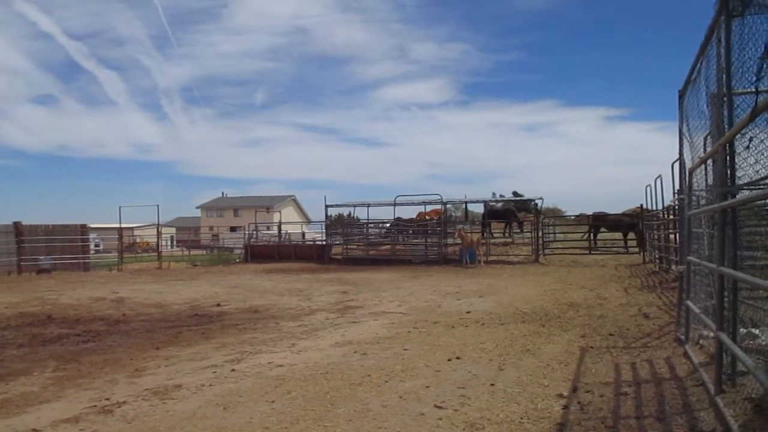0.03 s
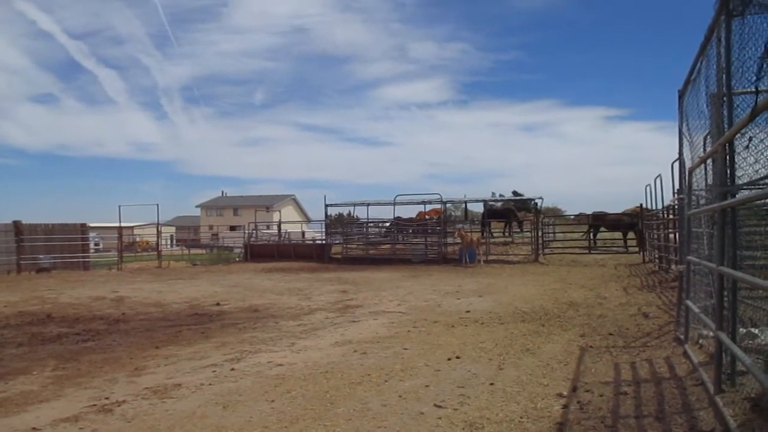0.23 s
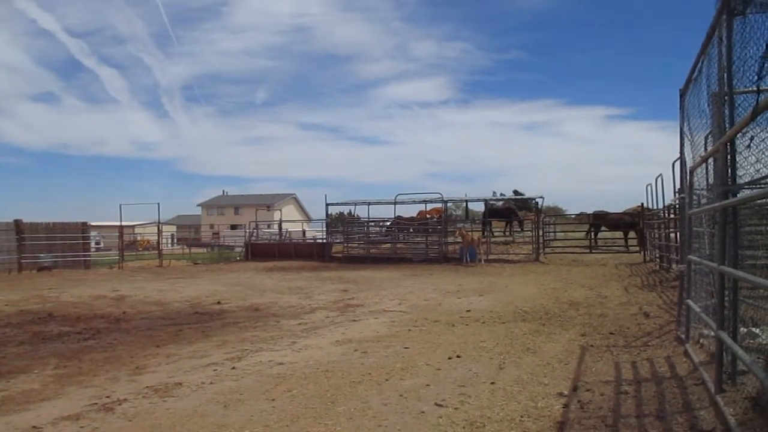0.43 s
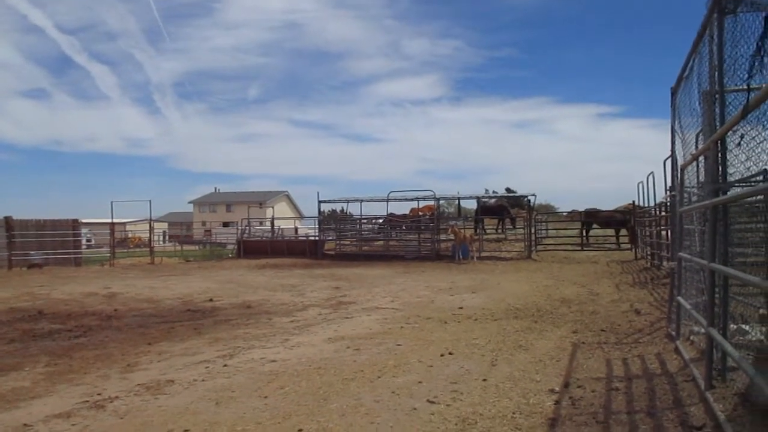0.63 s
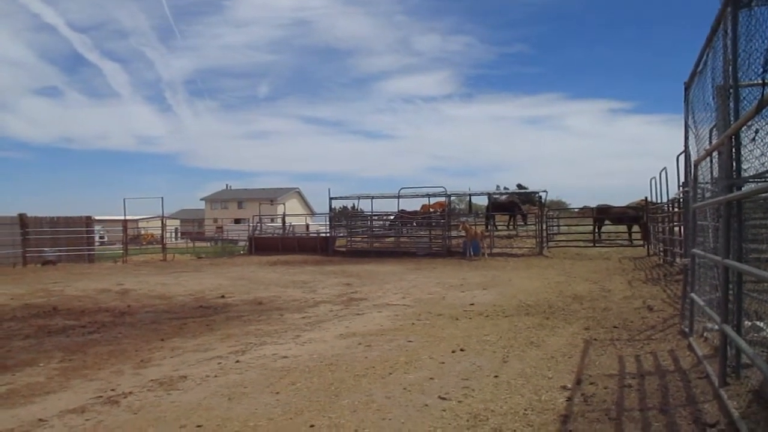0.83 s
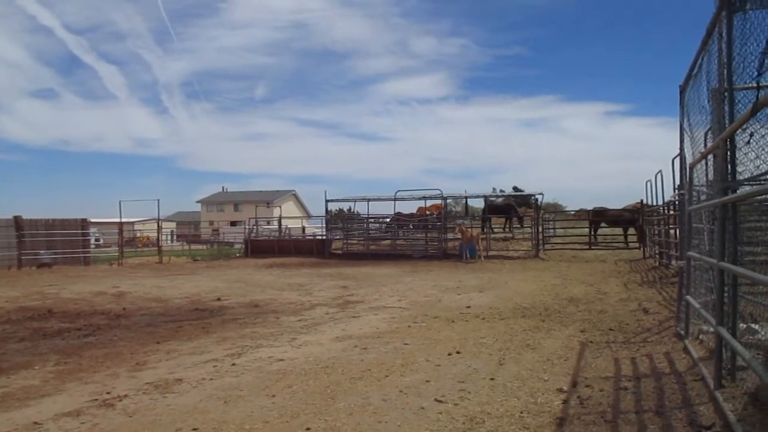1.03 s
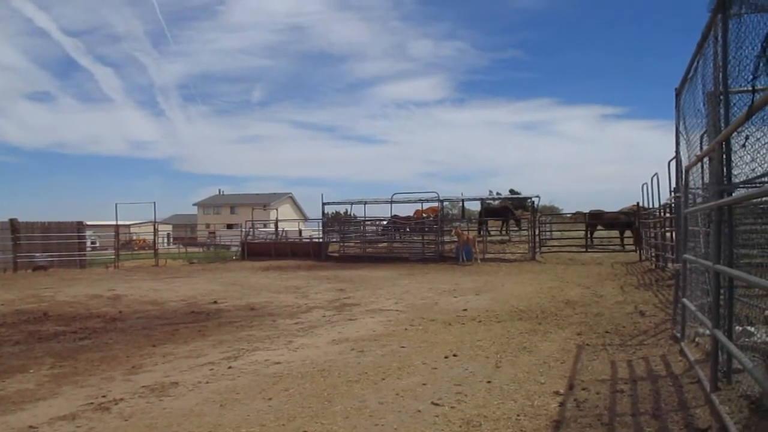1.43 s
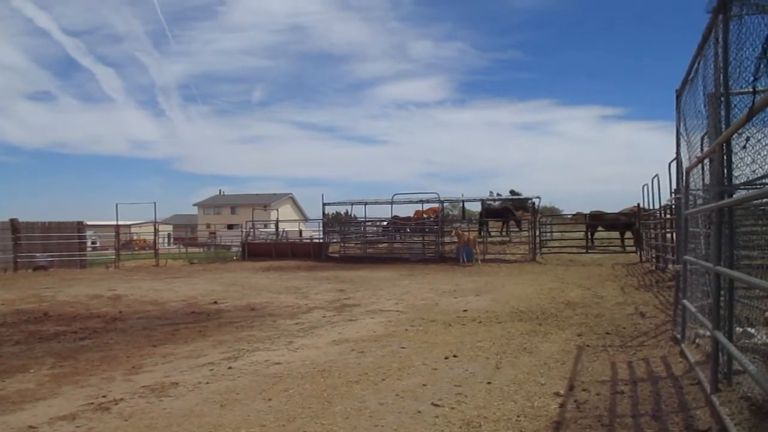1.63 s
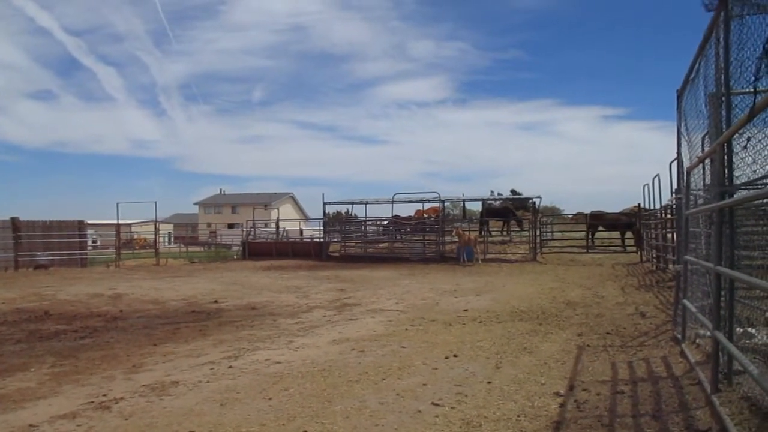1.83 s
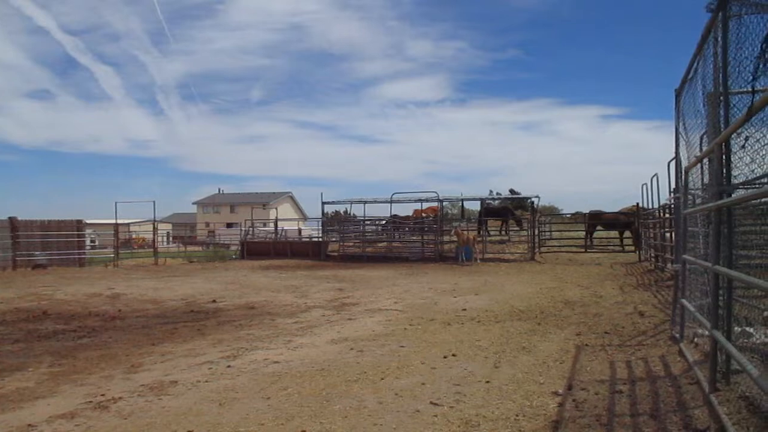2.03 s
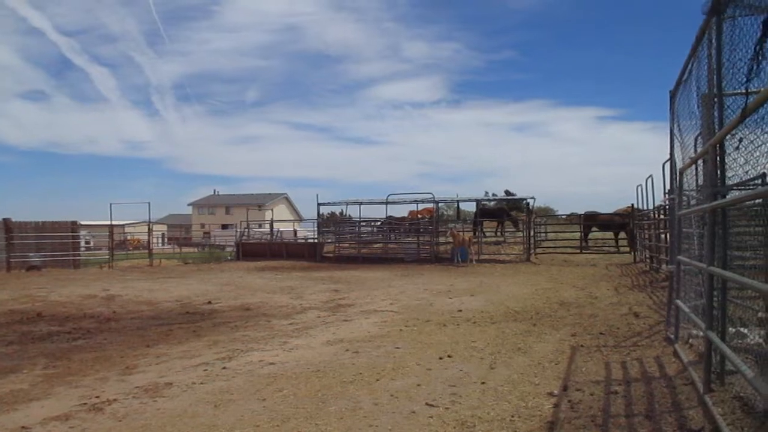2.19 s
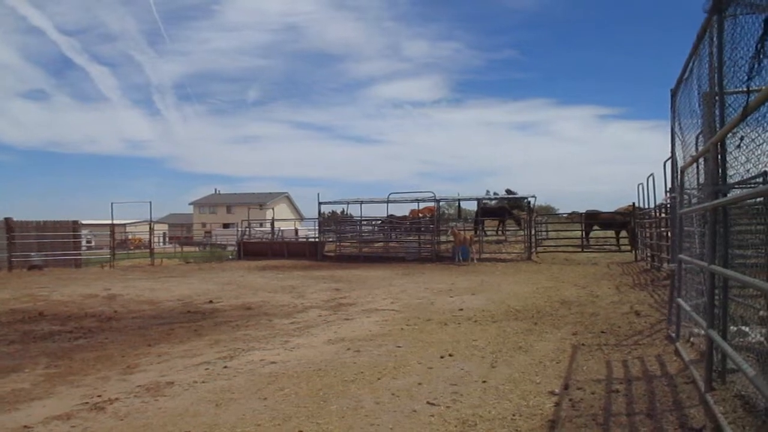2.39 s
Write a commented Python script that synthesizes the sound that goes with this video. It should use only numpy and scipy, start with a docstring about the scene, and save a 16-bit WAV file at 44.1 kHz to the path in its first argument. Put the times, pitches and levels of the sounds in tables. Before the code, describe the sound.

A horse whinnies once, high and quavering, sinking into a fluttering nicker over light wind.

```python
"""Whinny across a paddock

A horse's low grunt jumps into a high, quavering squeal. In the dips a second, lower voice breaks in
and shakes it, roughest past the middle of the call. Both ring through the throat's resonances, then
the call sinks into a fluttering nicker that slows to single flaps of air.
Light wind rumbles over the open dirt; the pens answer faintly."""
import sys
import numpy as np
from scipy import signal
from scipy.fft import rfft, irfft, next_fast_len
from scipy.io import wavfile
from scipy.ndimage import map_coordinates

SR = 44100
rng = np.random.default_rng(int(sys.argv[2]) if len(sys.argv) > 2 else 0)


def dump(signal):
    """Clip the signal to [-1, 1] and save it as 16-bit WAV at the path in sys.argv[1]."""
    limited = np.clip(np.atleast_2d(signal).T, -1, 1)
    pcm = np.round(limited * 32767).astype(np.int16)
    wavfile.write(sys.argv[1], SR, pcm)


N = 112454

# the squeal's rise and end, ahead of the throat (time [s], pitch [Hz], level [dB])
SQUEAL_ENDS = [(.24, 1000, -58.5), (.28, 1243, -12.5), (.308, 1274, -16), (1.82, 1300, -38)]
# its quavers: a crest, then a dip, each (time [s], pitch [Hz], level [dB])
QUAVERS = [(.362, 1781, -17.5, .392, 1602, -13), (.437, 1884, -19, .478, 1598, -10.5),
           (.525, 1766, -12.5, 0.55, 1530, -11), (.618, 1851, -11.5, .66, 1600, -11.5),
           (.718, 1941, -11, .768, 1631, -15), (.818, 1926, -11, .868, 1591, -13.5),
           (.922, 1893, -12.5, 1, 1566, -17), (1.025, 1867, -10, 1.072, 1557, -14),
           (1.13, 1869, -11, 1.16, 1558, -16.5), (1.235, 1866, -12.5, 1.31, 1549, -16.5),
           (1.343, 1846, -11.5, 1.39, 1442, -15), (1.448, 1776, -12.5, 1.52, 1400, -18.5),
           (1.555, 1726, -12, 1.603, 1335, -21), (1.658, 1604, -12.5, 1.73, 1253, -30),
           (1.755, 1404, -16.5, 1.785, 1345, -17.5)]
# its overtones, ahead of tilt and resonances (multiple of the pitch, level [dB])
OVERTONES = [(2, -24.5), (3, -30.5), (4, -40.5), (5, -47.5), (6, -41.5), (7, -45)]
# their tilt, round to shrill (time [s], tilt [dB per overtone])
OVERTONE_TILT = [(.31, 2), (.36, -16), (.41, -12), (.46, -3), (.6, 0), (.75, -1), (1.3, -0.5), (1.6, 0)]
# low voice (time [s], length [s], pitch [Hz], tone [dB], rasp [dB], hiss [dB], roughness [0-1])
BURSTS = [(.482, 0.055, 420, -55, -27, -44, 0.6), (0.571, 0.058, 431.4, -26, -19.5, -39, 0),
          (.664, 0.05, 427.9, -27.5, -18, -34.5, 0.08), (0.767, 0.069, 385.2, -26.5, -16.5, -39, 0.62),
          (0.871, 0.083, 345, -24.5, -18.5, -35.5, 0.69), (.972, 0.083, 349.9, -21.5, -19, -35.5, 0.62),
          (1.073, 0.094, 335, -24, -18.5, -34.5, 0.79), (1.177, .1, 340.5, -25.5, -17, -34, 0.87),
          (1.283, 0.095, 333.9, -24, -17.5, -36.5, 0.86), (1.387, 0.094, 355.1, -21.5, -17.5, -47.5, .7),
          (1.496, 0.1, 364.6, -21, -19, -46.5, .7), (1.603, .1, 354.9, -19, -20, -41.5, 0.62),
          (1.694, 0.088, 335, -16.5, -19.5, -39.5, 0.26), (1.772, 0.068, 338.9, -16, -17, -37, 0.32)]
# envelope of a burst (time from its middle [lengths], tone [dB], rasp [dB], hiss [dB])
BURST_ENVELOPE = [(-0.88, -33, -38, -33), (-.4, -17.5, -5.5, -6.5), (-0.24, -3.5, 1.5, -1),
                  (-0.032, 1.5, -9.5, -6.5), (0.2, -3, -3.5, -3), (0.29, -21, -11, -7.5),
                  (0.66, -54, -24.5, -24)]
# opening grunt (time [s], pitch [Hz], tone [dB], rasp [dB])
GRUNT = [(.06, 104.8, -51, -57), (.13, 125, -46, -70), (.17, 161.4, -33, -43), (.236, 187.5, -31, -32.5),
         (.25, 285.7, -20.5, -23.5), (.28, 337, -21, -28.5), (.318, 361.2, -18, -25.5),
         (.335, 350, -40.5, -34), (.368, 352, -31, -51), (.39, 352, -55, -74)]
# the nicker's fade (time [s], chest [dB], rasp [dB])
NICKER_LEVELS = [(1.8, -17, -31), (1.814, -23.5, -29.5), (1.894, -20, -23.5), (1.938, -25.5, -29),
                 (1.978, -20.5, -19.5), (2.054, -21, -30), (2.092, -22.5, -22.5), (2.15, -31.5, -37.5),
                 (2.194, -25.5, -29), (2.28, -33.5, -41), (2.3, -28, -31.5), (2.346, -39.5, -40),
                 (2.476, -31.5, -36), (2.482, -24.5, -44), (2.516, -42, -31), (2.55, -28, -42)]
# its sinking and slowing (time [s], pitch [Hz], flutter [Hz])
NICKER_RATES = [(1.8, 325.8, 81), (1.95, 294.2, 78.5), (2.08, 256.3, 67.6), (2.2, 234.8, 54),
                (2.5, 213.7, 36)]
# strongest flaps (time [s], level [dB])
FLAPS = [(1.712, -28), (2.025, -22), (2.064, -22), (2.088, -19.5), (2.159, -28), (2.177, -25.5),
         (2.299, -26), (2.367, -32.5), (2.416, -28), (2.448, -29.5), (2.469, -29.5), (2.521, -27.5)]
# squeaks of air (time [s], length [s], start pitch [Hz], end pitch [Hz], level [dB])
SQUEAKS = [(0.213, 0.037, 4500, 3910, -46), (2.001, 0.051, 4530, 4160, -48),
           (2.243, 0.065, 6300, 4900, -61)]
# wind buffets (time [s], level [dB])
GUSTS = [(0.0, -46), (0.04, -34.5), (0.15, -40.5), (1.36, -51), (1.41, -43.5), (1.55, -49), (1.84, -36),
         (1.89, -38), (1.95, -29.5), (1.99, -58), (2.04, -25), (2.09, -29), (2.52, -35), (2.55, -41)]
# throat and upper resonances (centre [Hz], width [Hz], level [dB])
THROAT_RESONANCES = [(1017, 116, -2), (1361, 115, -6), (1693.8, 70, 2), (1970, 128, 2), (2248, 31, -0.5),
                     (2354, 79, 2), (2980, 88, -14.5), (3560, 57, -7), (5330, 170, -15)]
UPPER_RESONANCES = [(3064, 144, -2.5), (3223, 120, -1.5), (3510, 215, -3), (4134, 240, 2), (4800, 260, 0),
                    (5380, 150, 1), (6890, 440, -1), (7270, 200, -9), (8120, 500, -3), (8940, 450, -8.5),
                    (10960, 1100, -16)]
# tone colour of each layer (frequency [Hz], level [dB])
RASP_EQ = [(300, -12), (600, 3), (800, -5.5), (940, 3), (1070, -1.5), (1160, -4), (1330, 0.5), (2280, 2),
           (2400, -10.5), (2650, -9.5), (4000, -7), (6000, -12), (15000, -25)]
HISS_EQ = [(2000, -35), (3200, 5), (6000, -3.5), (9000, -0.5), (10500, -6), (15500, -11)]
GROWL_EQ = [(90, -40), (190, -15), (270, 1.5), (400, 1), (500, -7), (600, -9), (800, -31), (4000, -110)]  # the low voice's rough edge
THROATY_EQ = [(400, -31), (620, -9), (880, 2), (1100, 5.5), (1330, 8), (1650, -19), (3000, -72)]  # its chesty harmonics
NICKER_RASP_EQ = [(300, -2), (580, 6.5), (780, -7), (1000, 6.5), (1170, 4), (1400, 3), (2280, -3.5),
                  (2400, -17.5), (2700, -7.5), (3800, -9.5), (5500, -37), (15000, -29)]
NICKER_HISS_EQ = [(3000, -1), (6000, -10.5), (6700, -5.5), (7500, -9.5), (9100, -2), (10000, -17),
                  (11200, -8.5), (12200, -15), (15500, -29.5)]
CHEST_EQ = [(30, -17), (70, -26.5), (150, 1), (195, -8.5), (250, 4), (370, -4.5), (480, -19.5), (800, -28),
            (4000, -110)]
WIND_EQ = [(15, -23), (40, -9.5), (75, -1.5), (130, -7.5), (250, -20), (800, -39), (4000, -110)]
AIR_EQ = [(30, -16), (90, -9.5), (350, -2.5), (480, -10), (1000, -15.5), (2100, -23), (2300, -14),
          (2480, -28), (5000, -35), (10000, -41), (15500, -43.5)]


def squeal(jitter=0.0392, sidebands=0.61, full_shake_db=-20.5):
    """Two voices at once: the high one swings through the resonances while the low one shakes it."""
    hz, level_db = quavers()
    low, low_phase, rasp_gain, rough = low_voice(hz)
    shake = np.clip(rasp_gain / amp(full_shake_db), 0, 1)
    phase = phase_of(hz * (1 + 0.0038 * wobble(250) + jitter * shake * rough * wobble(700)))
    tremolo = 1 + sidebands * shake * np.cos(low_phase)
    swell = np.sqrt(2) * amp(level_db) * tremolo * between(0.27, 1.82, .01)
    return filtered(swell * np.sin(phase), throat) + filtered(swell * overtones(phase), upper) + low


def quavers(fall_skew=0.96, rise_skew=.88):
    """Pitch and level glide from crest to dip and back; a skew under 1 moves early in the swing."""
    crests, dips = [q[:3] for q in QUAVERS], [q[3:] for q in QUAVERS]
    times, hz, db = np.transpose(sorted(crests + dips + SQUEAL_ENDS))
    turns = np.arange(len(times))
    step = np.interp(clock(), times, turns)
    falling = np.append(np.diff(hz) < 0, False)[step.astype(int)]
    skew = np.where(falling, fall_skew, rise_skew)
    eased = np.floor(step) + np.sin(np.pi / 2 * (step % 1) ** skew) ** 2
    return np.interp(eased, turns, hz), np.interp(eased, turns, db)


def overtones(phase, flicker_db=4.0, fray_per_s=0.16):
    """The squeal's overtones strengthen as it turns shrill and fray as the horse tires."""
    tilt_db, = curves(OVERTONE_TILT)
    frayed = phase + fray_per_s * clock() * wobble(650)
    return sum(amp(db + tilt_db * (k - 2) + flicker_db * wobble(90)) * np.sin(k * frayed)
               for k, db in OVERTONES)


def low_voice(high_hz, grain_db=1.2, throaty_cap_db=-32, growl_db=-1):
    """Rasping, breathy bursts from the vocal folds, their pitch bending with the squeal."""
    t = clock()
    offsets, *envelopes = np.transpose(BURST_ENVELOPE)
    gains, rows = np.zeros((3, N)), []
    for s, length, hz, *levels, roughness in BURSTS:
        for gain, db, envelope in zip(gains, levels, envelopes):
            gain += amp(db + np.interp((t - s) / length, offsets, envelope, -np.inf, -np.inf))
        rows.append((s, hz / np.interp(s, t, high_hz), roughness))
    tone_gain, rasp_gain, hiss_gain = gains
    pitch_ratio, rough = curves(rows)
    tone, buzz, phase = folds(pitch_ratio * high_hz, rough)
    breath = noise() * (1 + 0.22 * np.cos(phase)) * amp(grain_db * wobble(130))
    hiss = shaped(breath, hiss_gain, HISS_EQ, upper)
    throaty = shaped(buzz, np.minimum(tone_gain, amp(throaty_cap_db)), THROATY_EQ, throat)
    growl = shaped(noise(), tone_gain * rough * amp(growl_db), GROWL_EQ)
    rasp = shaped(buzz, rasp_gain, RASP_EQ, throat)
    return tone_gain * tone + rasp + throaty + growl + hiss, phase, rasp_gain, rough


def grunt(octave_cap_db=-32, octave_fade_hz=250, hiss_db=-23):
    """The voice starts low, with a strong octave that fades as the pitch leaps up."""
    hz, tone_db, rasp_db = curves(GRUNT)
    tone, buzz, phase = folds(hz, rough=0.16)
    octave_gain = amp(np.minimum(tone_db, octave_cap_db)) / (1 + (hz / octave_fade_hz) ** 8)
    octave = octave_gain * np.sqrt(2) * np.sin(2 * phase)
    hiss = shaped(noise(), amp(rasp_db + hiss_db), HISS_EQ, upper)
    rasp = shaped(buzz, amp(rasp_db), RASP_EQ, throat)
    return between(0.055, .39, .02) * (amp(tone_db) * tone + octave + hiss + rasp)


def nicker(start_s=1.802, end_s=2.33, flutter_db=5.0, uneven=0.1399):
    """The low voice sinks, chopped by an uneven flutter that slows down."""
    chest_db, rasp_db = curves(NICKER_LEVELS)
    hz, flutter_hz = curves(NICKER_RATES)
    tone, buzz, _ = folds(hz, rough=.55)
    flutter = amp(flutter_db * np.cos(phase_of(flutter_hz * (1 + uneven * wobble(60)))))
    flutter /= rms(flutter)
    voiced = between(start_s, end_s, 0.018)
    hum = voiced * amp(chest_db - 2) * tone * np.sqrt(flutter)
    rasp = shaped(buzz * flutter, voiced * amp(rasp_db), NICKER_RASP_EQ, throat)
    # chest and breath carry on after the voice stops
    chest_gain = amp(chest_db - 1) * between(start_s - .04, np.inf, 0.31)
    chest = shaped(noise() * flutter, chest_gain, CHEST_EQ)
    hiss_gain = amp(0.57 * rasp_db - 32) * between(start_s, np.inf, 0.027)
    hiss = shaped(noise() * flutter, hiss_gain, NICKER_HISS_EQ)
    return hum + rasp + chest + hiss


def flaps(attack_s=0.0034, thump_db=1):
    """The flutter ends in single puffs, each with a soft thump."""
    gain = np.zeros(N)
    for s, db in FLAPS:
        age = np.maximum(clock() - s + attack_s, 0) / attack_s
        gain += amp(db) * (age * np.exp(1 - age)) ** 2
    puffs = shaped(noise(), gain, NICKER_RASP_EQ, throat)
    return puffs + shaped(noise(), gain * amp(thump_db), CHEST_EQ)


def squeaks(waver=0.0052):
    """Thin, falling whistles of air just before the squeal and as the call dies."""
    out = np.zeros(N)
    for s, length, start_hz, end_hz, db in SQUEAKS:
        progress = np.clip((clock() - s) / length, 0, 1)
        hz = (start_hz + (end_hz - start_hz) * progress) * (1 + waver * wobble(400))
        out += amp(db) * np.sin(np.pi * progress) * np.sqrt(2) * np.sin(phase_of(hz))
    return out


def folds(hz, rough, jitter=.13, shimmer=0.5):
    """Vocal folds: a fundamental, and a buzz of pulses that turn to noisy puffs as they roughen."""
    phase = phase_of(hz * (1 + jitter * rough * wobble(330)))
    tone = np.sqrt(2) * (1 + shimmer * rough * wobble(200)) * np.sin(phase)
    pulses = np.diff(np.exp(45 * (np.cos(phase) - 1)), prepend=0)
    puffs = noise() * (1 + 0.93 * np.cos(phase))
    pulses, puffs = [v / rms(filtered(v, throat)) for v in (pulses, puffs)]
    buzz = np.sqrt(1 - rough) * pulses + np.sqrt(rough) * puffs
    return tone, buzz, phase


def throat(f, notch_hz=1790, width_hz=110, notch_db=-8):
    """The main resonances and a notch that the squeal dips through."""
    gap, damping = notch_hz ** 2 - f * f, 1j * f * width_hz
    return ringing(THROAT_RESONANCES, f) * (gap + damping * amp(notch_db)) / (gap + damping)


def upper(f):
    """Narrow treble resonances that colour the breath and the overtones."""
    return ringing(UPPER_RESONANCES, f)


def yard(x, t60_s=0.52, build_s=0.0081):
    """Scattered echoes from the pens and sheds."""
    t = np.arange(SR // 2) / SR
    tail = rng.standard_normal(len(t)) * amp(-60 * t / t60_s) * (1 - np.exp(-t / build_s))
    return signal.fftconvolve(x, tail / np.linalg.norm(tail))[:N]


def wind(air_db=-40):
    """Low buffeting over a steady bed of air."""
    gust_db, = curves(GUSTS)
    rumble = shaped(noise(), amp(gust_db + 1.5 * wobble(5.21)), WIND_EQ)
    return rumble + shaped(noise(), amp(air_db + wobble(3.73)), AIR_EQ)


def shaped(source, gain, eq, body=lambda f: 1):
    """A source swelling with gain, through an EQ curve and a body; gain sets the rms."""
    hz, db = np.transpose(eq)
    response = lambda f: amp(np.interp(np.log(f + 1), np.log(hz), db)) * body(f)
    return filtered(source * gain, response) / rms(filtered(source, response))


def ringing(table, f):
    """A bank of resonances, with notches between them."""
    return sum(amp(db) * 1j * f * width / (hz * hz - f * f + 1j * f * width) for hz, width, db in table)


def filtered(x, response):
    """x through a frequency response."""
    size = next_fast_len(N + SR // 2)
    return irfft(rfft(x, size) * response(np.fft.rfftfreq(size, 1 / SR)), size)[:N]


def curves(rows):
    """An automation curve for each column after the time."""
    times, *columns = np.transpose(rows)
    return [np.interp(clock(), times, column) for column in columns]


def between(start, end, fade):
    """A gate with soft edges."""
    return np.clip(np.minimum(clock() - start, end - clock()) / fade + .5, 0, 1)


def wobble(rate):
    """A smooth random curve, rate knots a second."""
    return map_coordinates(rng.standard_normal(8192), [clock() * rate], mode="wrap")


def noise():
    """White noise."""
    return rng.standard_normal(N)


def phase_of(hz):
    """Running phase of a gliding pitch."""
    return 2 * np.pi * np.cumsum(hz) / SR


def amp(db):
    """Decibels to gain."""
    return 10 ** (np.asarray(db) / 20)


def rms(x):
    """Average level."""
    return np.sqrt(np.mean(x ** 2) + 1e-20)


def clock():
    """The time of each sample."""
    return np.arange(N) / SR


def scene(echo_db=-11.5):
    """The horse, its echo and the wind, in mono."""
    horse = grunt() + squeal() + nicker() + flaps() + squeaks()
    return (horse + amp(echo_db) * yard(horse) + wind())[None]


def record(dry, top_hz=15700):
    """A brick-wall cut takes off the highest treble."""
    return filtered(dry[0], lambda hz: hz < top_hz)[None]


dry = scene()
out = record(dry)
dump(out)
```